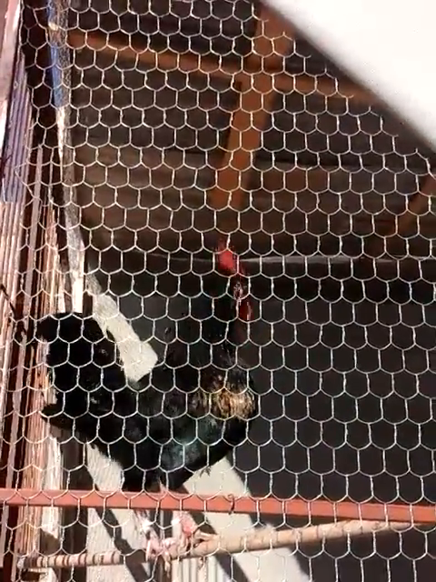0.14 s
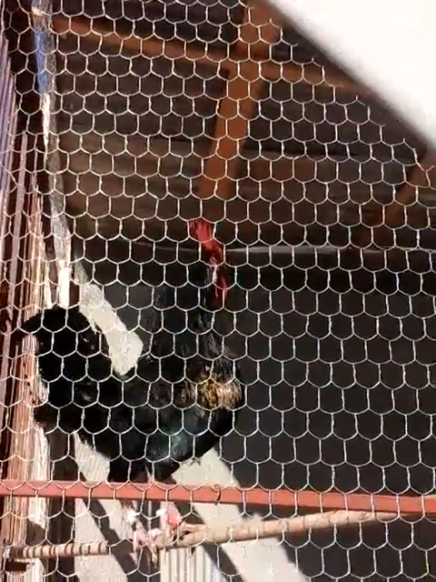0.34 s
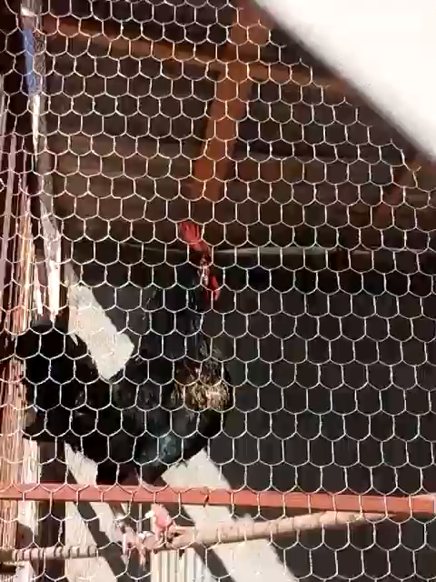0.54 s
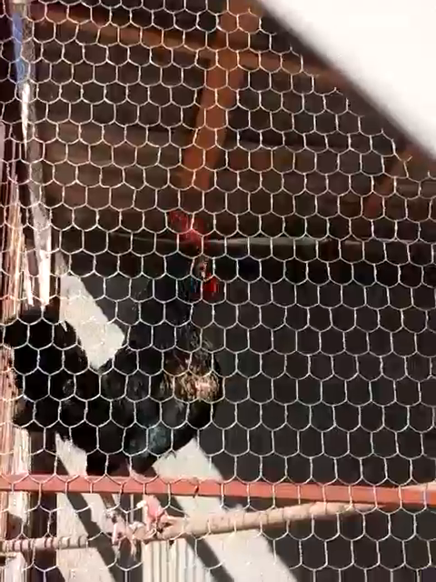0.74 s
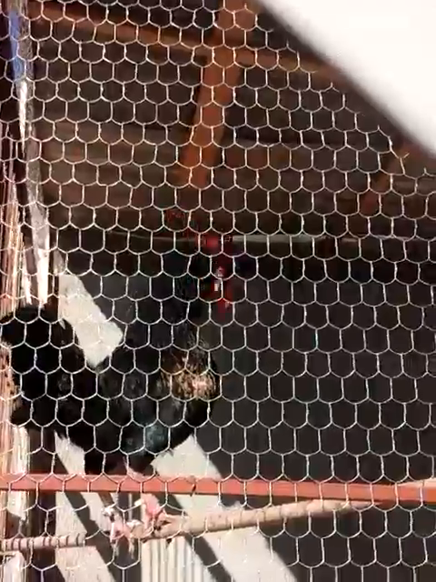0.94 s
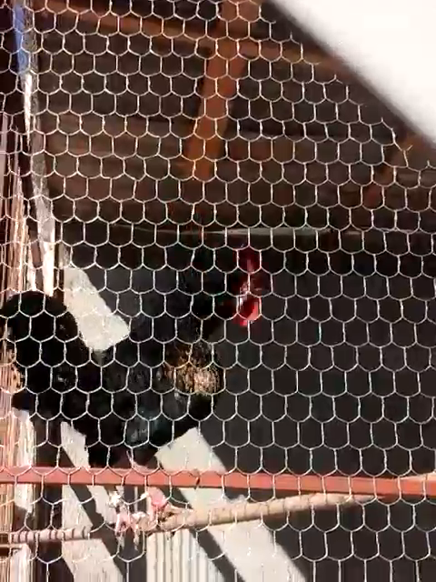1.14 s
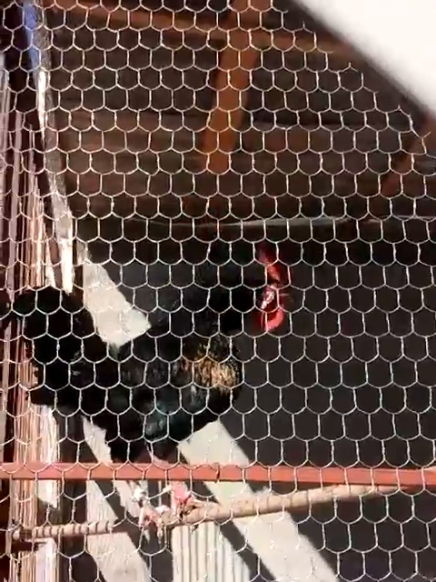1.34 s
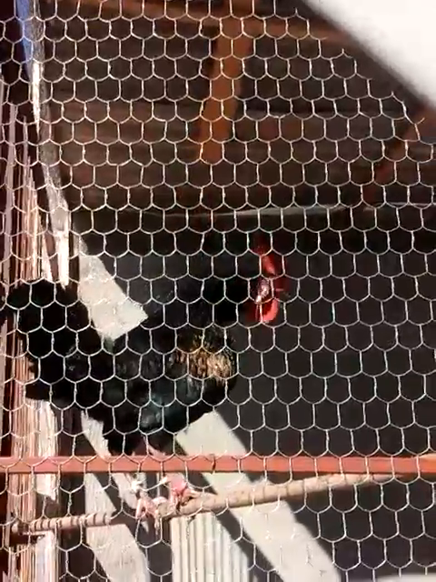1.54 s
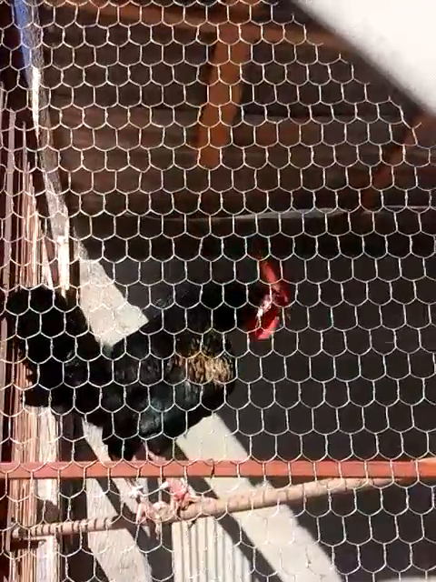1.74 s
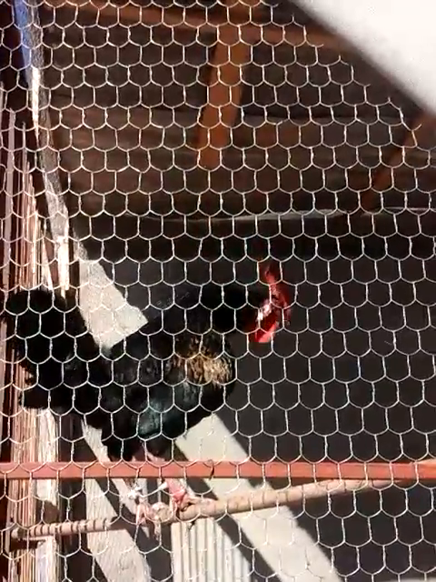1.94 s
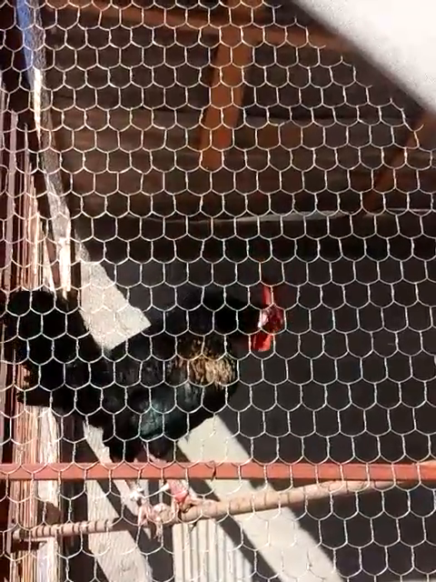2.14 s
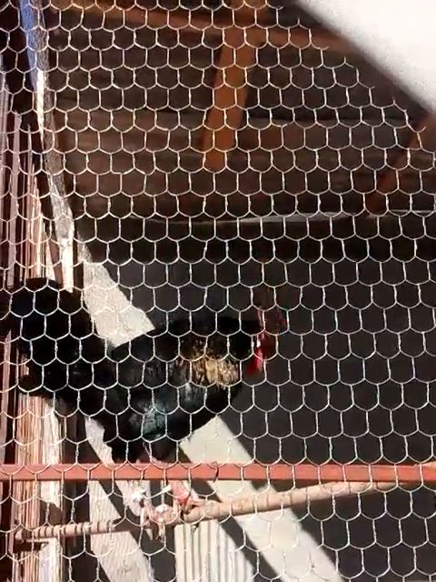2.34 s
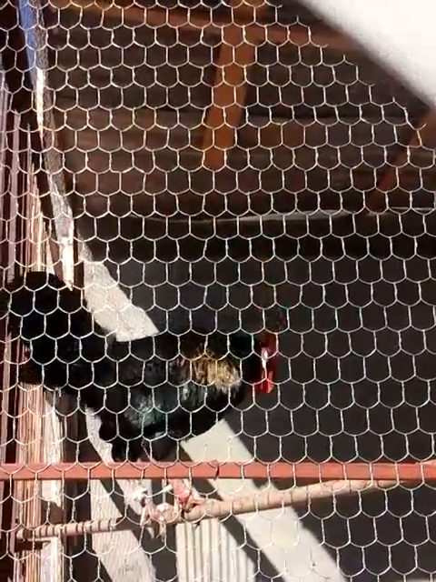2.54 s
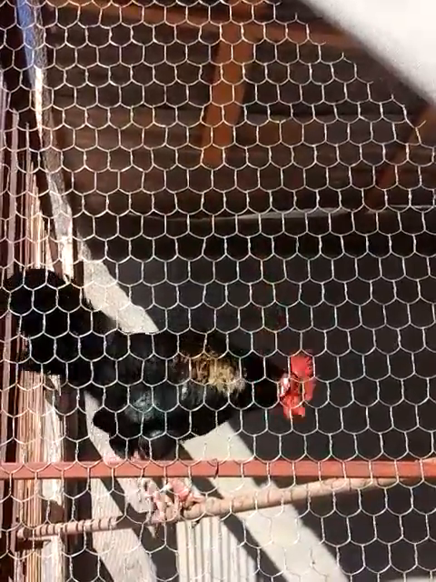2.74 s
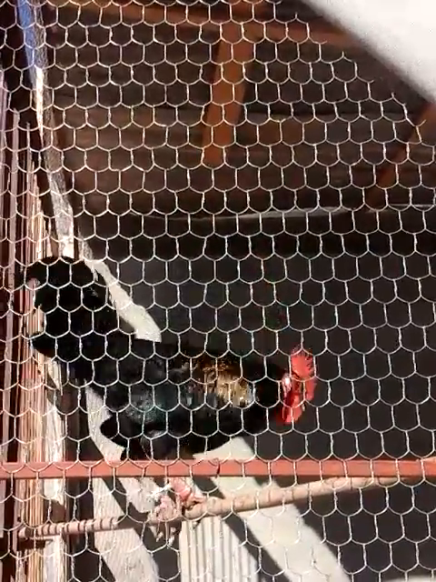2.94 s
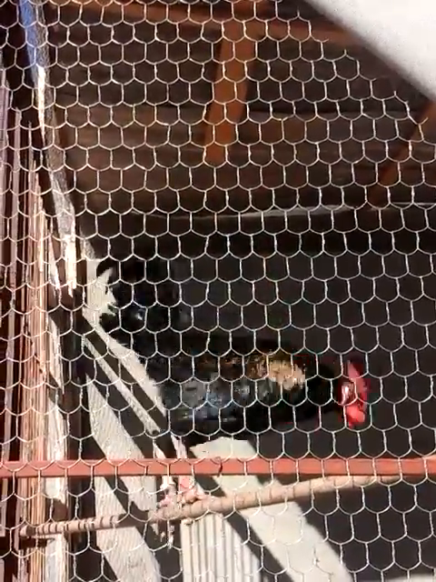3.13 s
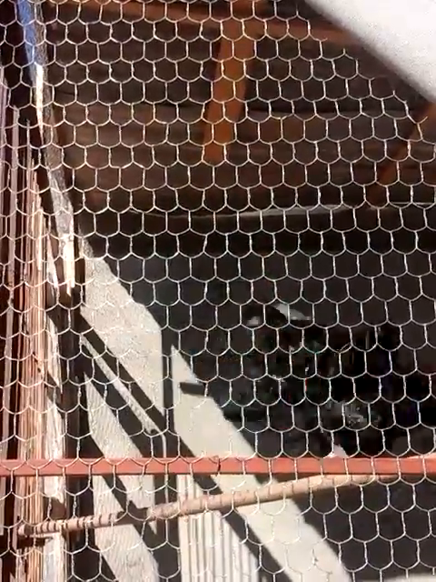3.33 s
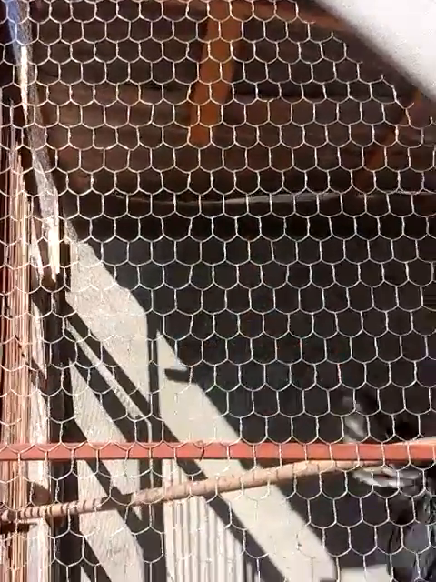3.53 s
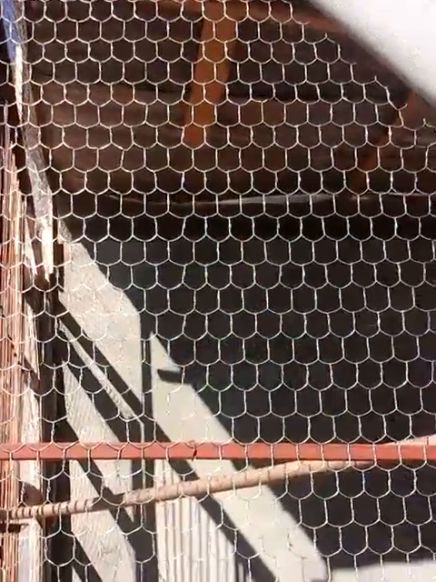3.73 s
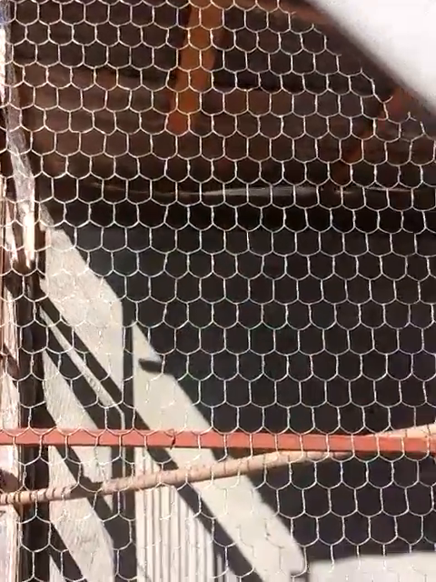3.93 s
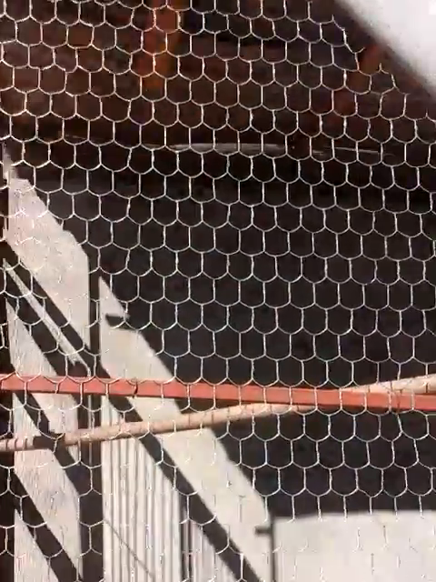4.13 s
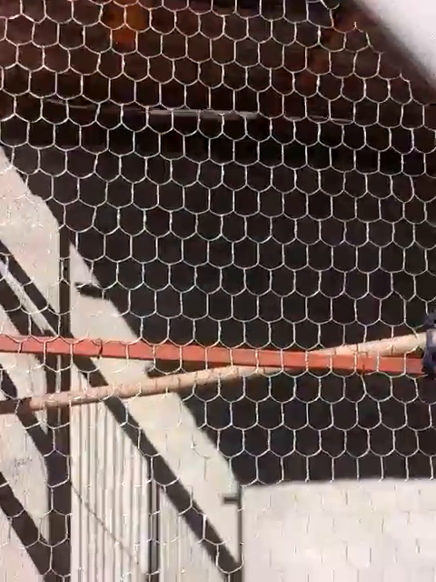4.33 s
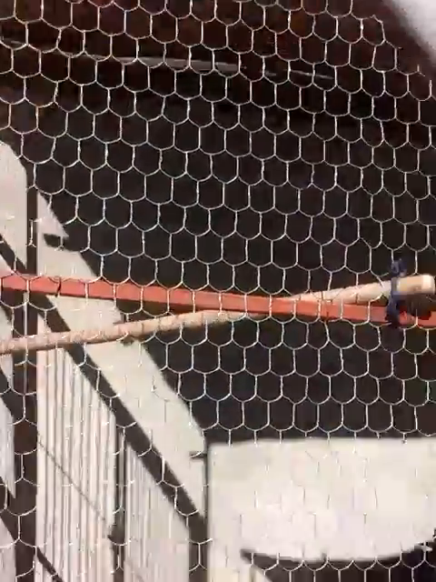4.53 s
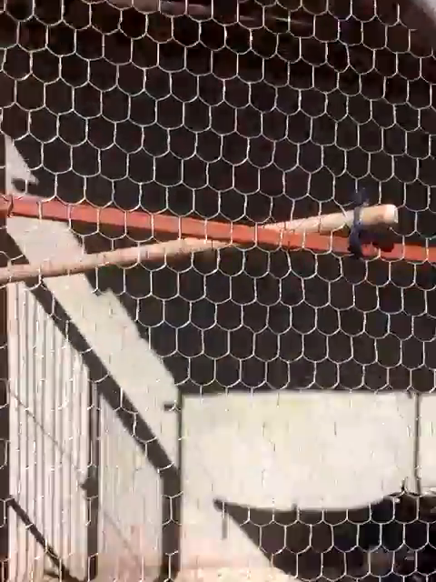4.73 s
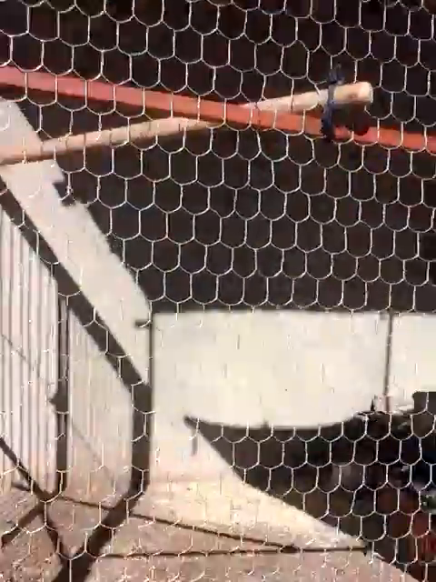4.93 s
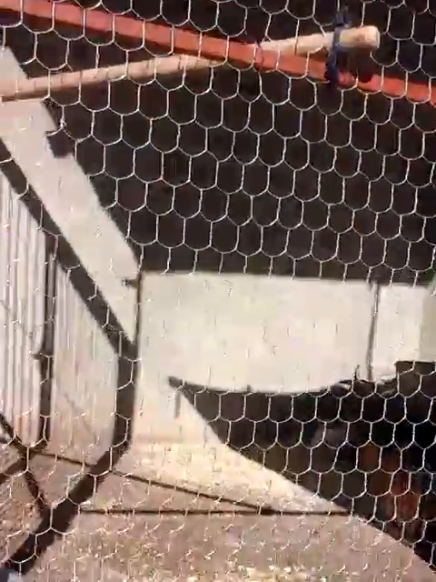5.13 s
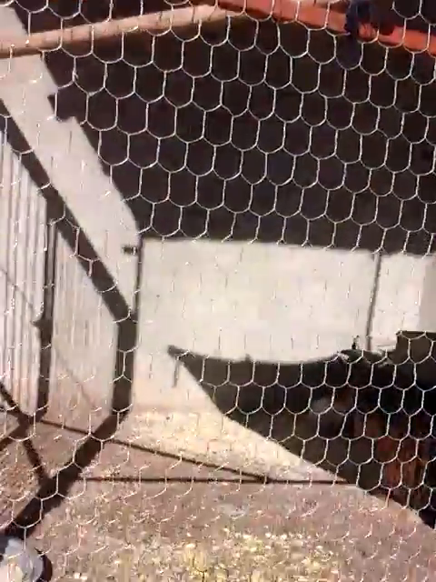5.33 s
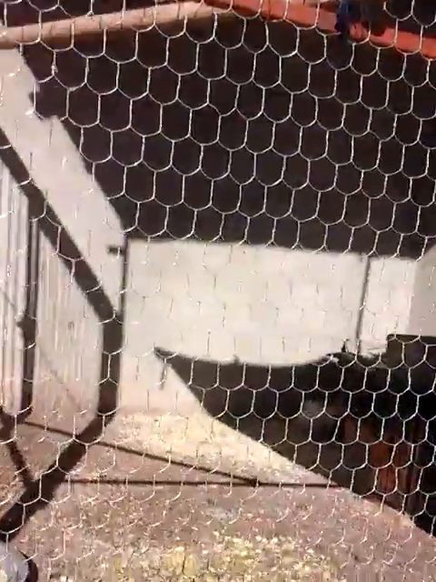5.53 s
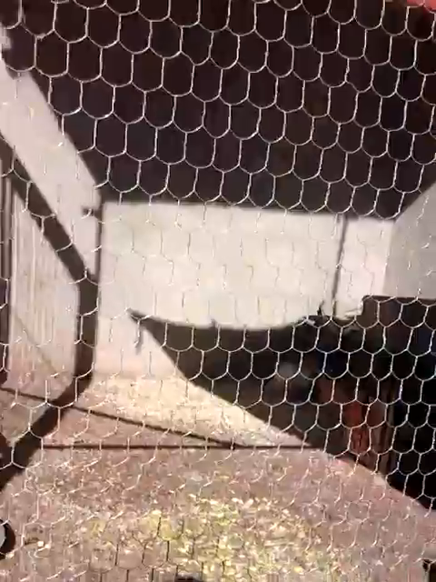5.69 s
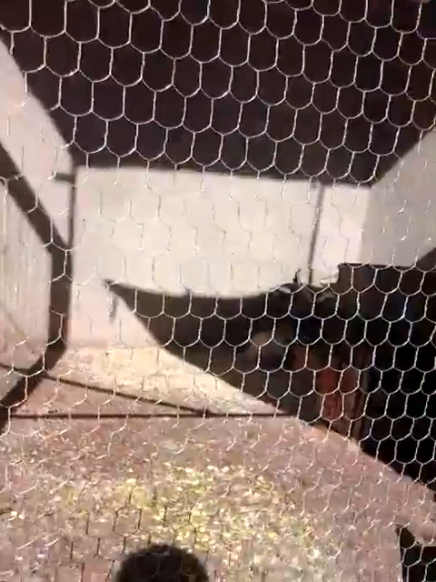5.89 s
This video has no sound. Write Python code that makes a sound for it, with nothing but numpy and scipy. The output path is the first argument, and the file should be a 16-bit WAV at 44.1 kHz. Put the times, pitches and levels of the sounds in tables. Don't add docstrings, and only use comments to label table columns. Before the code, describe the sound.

A rooster close by crows once, two rough notes into a long hoarse cry that falls away, then wheezes in, clinks its perch and flaps down.

```python
import sys
import numpy as np
from scipy import signal
from scipy.fft import rfft, irfft, next_fast_len
from scipy.io import wavfile
from scipy.ndimage import uniform_filter1d, minimum_filter1d, map_coordinates

SR = 44100
rng = np.random.default_rng(int(sys.argv[2]) if len(sys.argv) > 2 else 0)


def how_loud(loudness_db):
    steps = np.asarray(loudness_db, float) / 20
    return 10 ** steps


def wav_record(signal):
    frames = np.transpose(np.atleast_2d(signal))
    bounded = np.clip(frames, -1, 1)
    quanta = np.round(bounded * 32767).astype(np.int16)
    wavfile.write(sys.argv[1], SR, quanta)


N = 262836
CROW_N = int(2.5 * SR)
SOIL_FROM_S = 3.5


def unit(x):
    return x / np.sqrt(np.mean(x ** 2) + 1e-20)


def along(points, hz):
    f, v = np.transpose(points)
    return np.interp(np.log(hz + 1), np.log(f + 1), v)


def curves(rows, n=N):
    s, *cols = np.transpose(rows)
    return [np.interp(np.arange(n) / SR, s, c) for c in cols]


def gate(rows, fade, n=N):
    t = np.arange(n) / SR
    rise = np.clip((t - rows[0][0]) / fade, 0, 1)
    return rise * np.clip((rows[-1][0] - t) / fade + 1, 0, 1)


def wobble(rate, n=N):
    return map_coordinates(rng.standard_normal(6000), [np.arange(n) * min(rate, 900) / SR])


def peaks(hz, modes, order=2):
    gain = 0
    for c, w, db in modes:
        damping = (hz * w) ** 2
        gain = gain + how_loud(db) * (damping / ((c * c - hz * hz) ** 2 + damping + 1)) ** (order / 2)
    return gain


def noise(gain, n=N):
    m = next_fast_len(n)
    return unit(irfft(rfft(rng.standard_normal(m)) * gain(np.fft.rfftfreq(m, 1 / SR)), m)[:n])


def even(x, span):
    return x / np.sqrt(np.abs(uniform_filter1d(x * x, int(span * SR))) + 1e-12)


def tone(hz, jitter_hz, shimmer_db, rate):
    phase = 2 * np.pi * np.cumsum(hz + jitter_hz * wobble(rate)) / SR
    return unit(how_loud(shimmer_db * wobble(rate / 2)) * np.sin(phase))


def swells(rows):
    t = np.arange(N) / SR
    return sum(db * np.exp(-((t - s) / wide) ** 2) for s, db, wide in rows)


def sing(rows, fade, jitter_hz, shimmer_db, rate):
    hz, db = curves(rows)
    return gate(rows, fade) * how_loud(db) * tone(hz, jitter_hz, shimmer_db, rate)


# t/s, length/s, f/Hz, level/dB
MACHINE_RUNS = [(0, 0.33, 209, -58), (1.723, .4, 200.5, -58.5), (2.302, .45, 202.5, -55),
                (3.503, 0.22, 230.6, -60), (4.046, 0.27, 222.1, -60), (4.471, 0.18, 186, -64.5),
                (4.794, 0.58, 225.4, -60.5)]
# f/Hz, density level/dB per Hz
WIND_SPECTRUM = [(21, -47), (35, -10.5), (80, -3), (129, 1), (162, -7), (200, -5), (260, -33), (440, -120)]
MURMUR_SPECTRUM = [(150, -30.5), (250, -4), (342, -11.5), (816, -12), (1200, -15), (1610, -15),
                   (2800, -20.5), (3640, -48), (6160, -120)]
HISS_SPECTRUM = [(1350, -36.5), (2300, -16.5), (3050, -1), (3940, 1.5), (4450, -4), (6650, -10.5),
                 (8680, -11.5), (13400, -12), (14100, -13)]
# t/s, swell level/dB, width/s
GUSTS = [(.31, 4.7, 0.14), (1.458, 1.6, 0.091), (2.548, 7.8, 0.45), (3.821, 10, 0.182), (5.581, 5.65, 0.14)]
# t/s, level change/dB, width/s
BACKGROUND_SWELLS = [(2.6, 4, 0.26), (3.3, -3.5, 0.19), (3.75, 8.5, 0.22), (4.15, 6, 0.18), (4.85, 4, 0.29),
                     (5.45, 5, 0.21)]


def yard():
    idle_hz, idle_db = 229, -68
    runs = np.array([gate([(s,), (s + length,)], 0.2) for s, length, _, _ in MACHINE_RUNS])
    _, _, run_hz, run_db = np.transpose(MACHINE_RUNS)
    hz = idle_hz + (run_hz - idle_hz) @ (runs > 0)
    hum_db = idle_db + (run_db - idle_db) @ runs
    fuzz = noise(lambda f: peaks(f, [(196, 280, 0)]))
    hum = how_loud(hum_db) * (0.88 * tone(hz, 12, 3.1, 30) + 0.75 * fuzz)

    wind_db = -67.5 + swells(GUSTS) + 3.4 * wobble(3.4)
    wind = how_loud(wind_db) * noise(lambda f: how_loud(along(WIND_SPECTRUM, f)))

    background_db = swells(BACKGROUND_SWELLS) - 2.5 * np.clip(np.arange(N) / SR - SOIL_FROM_S, 0, None)
    murmur_db = -63 + 0.42 * background_db + 1.5 * wobble(3.4)
    murmur = how_loud(murmur_db) * noise(lambda f: how_loud(along(MURMUR_SPECTRUM, f)))
    hiss_db = -66.5 + background_db + .8 * wobble(12)
    hiss = how_loud(hiss_db) * noise(lambda f: how_loud(along(HISS_SPECTRUM, f)))
    return wind + hum + murmur + hiss


# t/s, f/Hz, level/dB
FAR_HEN = [(0.0, 816, -68), (0.02, 773, -55), (0.059, 800, -59), (0.075, 825, -92)]
# t/s, f/Hz, level/dB
CHIRPS = [
    [(4.85, 4100, -73), (4.9, 3800, -69), (4.96, 3914, -69)],
    [(5.415, 4950, -61), (5.435, 3970, -63), (5.46, 4200, -68), (5.52, 3836, -69), (5.56, 3690, -74)],
]


def far_birds():
    hen = sing(FAR_HEN, 0.0058, 11, 3.0, 60)
    return hen + sum(sing(rows, .01, 300, 5, 500) for rows in CHIRPS)


# f/Hz, t60/s
SHED_DECAY = [(300, 0.17), (1600, 0.55), (5000, 0.08), (12000, 0.035)]


def shed(x):
    hz, t, z = signal.stft(rng.standard_normal(SR // 2), SR, nperseg=256)
    decay = how_loud(-60 * t / along(SHED_DECAY, hz)[:, None])
    tail = signal.istft(z * decay, SR, nperseg=256)[1]
    return signal.fftconvolve(np.pad(x, (350, 0)), tail / np.linalg.norm(tail))[:N]


# delay t/s, level/dB
BOARDS = [(.0047, -16.5), (.011, -13.5), (.019, -12), (.028, -13)]


def boards(x):
    return sum(how_loud(db) * np.pad(x, (round(s * SR), 0))[:N] for s, db in BOARDS)


# t/s, feather level/dB, thud level/dB, hold/s
BLOWS = [
    (3.642, -44, -44.5, 0.018),
    (3.824, -34.5, -33.5, 0.0071),
]
# f/Hz, density level/dB per Hz
FEATHERS = [(410, -38), (700, 0), (1020, -8), (1330, -5.5), (1450, -7.5), (2510, -7), (3440, -6.5),
            (4000, -2), (6200, -17), (9500, -27), (14000, -23)]
GROUND = [(29, -49.5), (50, -17), (184, -0.5), (317, -3.5), (388, -2), (724, -22), (1010, -29),
          (1200, -15.5), (1560, -58), (2640, -120)]


def flap():
    t = np.arange(N) / SR

    def blow(s, hold, fall_db_per_s):
        before = np.clip(s - hold / 2 - t, 0, 1)
        after = np.clip(t - s - hold / 2, 0, 1)
        return -457 * before - fall_db_per_s * after

    shuffle = gate([(3.5,), (4.02,)], 0.11)
    feather = how_loud(-58) * shuffle + sum(how_loud(db + blow(s, hold, 410)) for s, db, _, hold in BLOWS)
    body = how_loud(-59) * shuffle + sum(how_loud(db + blow(s, hold, 220)) for s, _, db, hold in BLOWS)
    grains = how_loud(2.2 * wobble(300) + 1.5 * wobble(60))
    rustle = unit(noise(lambda f: how_loud(along(FEATHERS, f))) * grains)
    thud = unit(noise(lambda f: how_loud(along(GROUND, f))) * how_loud(3.3 * wobble(48.5)))
    return feather * rustle + body * thud


# t/s, peak level/dB, ring f/Hz, low ring level/dB
CLAW_TOUCHES = [(2.8145, -43, 4080, -16), (2.8594, -35.5, 3840, -15), (2.8714, -40, 3487, -16),
                (2.9647, -46, 3110, -16), (3.0574, -34.5, 4180, -4), (3.1961, -50.5, 4060, -17),
                (3.246, -49, 3570, -13), (3.2695, -42, 3550, -16), (3.6, -34, 3900, -17),
                (3.785, -47, 4000, -13), (4.0198, -42, 4630, -16), (4.0774, -43, 4020, -16),
                (4.1315, -40, 3955, -16), (4.1969, -37.5, 3500, -12), (4.2946, -40.5, 3610, -17),
                (5.253, -50, 3400, -15.5), (5.4256, -55, 3960, -16.5), (5.4595, -54, 4080, -16),
                (5.5204, -58, 3850, -16), (2.9297, -35, 3920, 7), (3.3443, -40.5, 4050, 2)]
# f/Hz, t60/s
PERCH_MODES = [(2250, 0.049), (3080, 0.027), (3530, 0.021), (4060, 0.045), (4600, 0.011), (5100, 0.0082)]


def claws():
    out, t = np.zeros(N + SR), np.arange(SR // 4) / SR
    for s, db, hz, low_db in CLAW_TOUCHES:
        on_soil = s > SOIL_FROM_S
        bar = 0
        for mode, t60 in PERCH_MODES:
            mode_db = -5 - 14 * abs(np.log2(mode / hz)) + (low_db + 6) * (mode < 2600) - 14 * on_soil
            mode_db += 2.5 * rng.standard_normal()
            bar = bar + how_loud(mode_db - 60 * t / t60) * np.sin(2 * np.pi * mode * t)
        scratch = noise(lambda f: peaks(f, [(hz * 0.99, 1400, 0)]), len(t))
        scratch *= (.45 if on_soil else .3) * how_loud(-60 * t / 0.17)
        crack = noise(lambda f: peaks(f, [(4200, 2930, 0), (9010, 8200, -25)]), len(t))
        crack *= (.8 if db > -40 else .4) * how_loud(-60 * t / 0.0084)
        onset = 1 - np.exp(-t / 0.00023)
        out[round(s * SR):][:len(t)] += how_loud(db - 7.5) * (bar + scratch + crack) * onset
    return out[:N]


# t/s, peak level/dB, f/Hz, t60/s
GULPS = [
    (2.534, -23.5, 671, 0.13),
    (2.554, -44, 660, 0.087),
    (2.603, -38, 697, 0.097),
    (2.665, -27.5, 678, 0.07),
    (2.697, -40, 650, 0.085),
    (2.723, -31.5, 700, 0.06),
    (2.79, -42, 695, 0.054),
    (2.813, -47, 651, 0.09),
]


def gulps():
    out, t = np.zeros(N), np.arange(SR // 8) / SR
    for s, db, hz, t60 in GULPS:
        ring = how_loud(-60 * t / t60) * np.sin(2 * np.pi * hz * t)
        puff = noise(lambda f: peaks(f, [(700, 580, 0)]), len(t)) * 0.49 * how_loud(-60 * t / 0.047)
        onset = 1 - np.exp(-t / (.01 if s < 2.65 else .0045))
        out[round(s * SR):][:len(t)] += how_loud(db) * (ring + puff) * onset
    return out


# t/s, f/Hz, level/dB
WHEEZE = [(2.33, 700, -34), (2.382, 711, -43), (2.44, 668.4, -47), (2.5, 628.3, -46.5), (2.56, 655, -47),
          (2.6, 660, -50.5), (2.73, 656.4, -46), (2.76, 631.5, -74), (2.88, 654, -76)]
# f/Hz, width/Hz, level/dB
GULLET = [(325, 57, 5), (945, 48, 15), (1190, 210, 2.5), (1532, 55, -5), (1914, 37, -1), (2300, 90, -2),
          (2640, 300, -5), (3650, 530, -1), (5610, 440, -15)]
# t/s, f/Hz, level/dB
CROAK = [[(2.47, 318 * k, db - 12), (2.56, 334 * k, db),
         (2.61, 330 * k, db - 12)] for k, db in enumerate([-43.5, -71, -58, -56.0], 1)]


def wheeze():
    hz, tone_db = curves(WHEEZE)
    t = np.clip(np.arange(N) / SR - WHEEZE[0][0], 0, None)
    thinning = how_loud(-45.5 - 52 * t)
    gasp = how_loud(-24.5 - 60 * t / 0.037)
    flow = thinning + gasp + how_loud(tone_db - 19.5) * np.clip(t / 0.052, 0, 1) ** 2
    air = noise(lambda f: peaks(f, GULLET)) * how_loud(1.6 * wobble(29.6))
    note = how_loud(tone_db) * tone(hz, 18, 4, 120)
    croak = sum(sing(rows, 0.0058, 11, 3.0, 60) for rows in CROAK)
    return gate(WHEEZE, 0.0026) * (note + flow * air) + croak


# t/s, f/Hz, level/dB
LEAD_IN = [(.13, 687, -40.5), (.165, 732.5, -28), (.2, 695, -40), (.235, 700, -35), (.265, 742, -26.5),
           (.3, 723, -47.5)]
WHISTLE = [(.33, 766, -28.5), (.37, 769.5, -17.5), (.47, 769, -39.5), (.495, 740.4, -17), (.55, 742, -18),
           (.62, 746, -24.5), (.68, 745.7, -16), (.75, 738.7, -22), (.77, 738.5, -25), (.95, 757, -38),
           (1.1, 755.6, -35.5), (1.25, 730.5, -38.5)]
# t/s, f/Hz, level/dB
PARTNERS = [
    [(.8, 1235, -36), (.93, 1233, -24.5), (1.1, 1217, -27.5), (1.28, 1230, -26.5), (1.45, 1216, -30),
     (1.58, 1200, -35)],
    [(.8, 2102, -33.5), (.92, 2085, -26.5), (1.1, 2085, -32), (1.25, 2055, -29), (1.4, 2024, -27.5),
     (1.5, 2124, -29.5), (1.59, 2094, -36.5)],
    [(1.93, 724, -37), (1.985, 710, -26), (2.02, 748, -35.5), (2.09, 750, -48)],
]


def second_membrane():
    return sum(sing(rows, 0.0058, 11, 3.0, 60) for rows in (WHISTLE, LEAD_IN, *PARTNERS))


# t/s, f/Hz, hoarseness 0-1, half-pitch level/dB
VOICE = [
    [(.07, 543, 0.95, -36), (.12, 613, 0.77, -44), (.2, 647, 0.48, -50.5), (.24, 598.3, 0.76, -35),
     (.31, 588, 0.8, -24)],
    [(.325, 613.5, 1, -26.5), (.347, 685.5, 0.9, -19), (.35, 545.5, 0.8, -24), (.41, 546.9, 1, -4),
     (.468, 597, 0.86, -26), (.476, 655, 0.7, -25.5), (.494, 672, .7, -25), (.503, 730, 0.5, -30),
     (.536, 738, 0.45, -25)],
    [(.54, 861.6, 0.84, -12), (.7, 846.7, 1.13, -3.5), (.86, 846, 0.91, -8), (1.1, 846.3, 0.91, -7.5),
     (1.22, 819.6, 1, 1), (1.45, 805, 1.04, -3.5), (1.6, 791.7, 0.88, -12.5), (1.69, 788, .86, -12),
     (1.73, 784, .66, -18), (1.95, 770, .66, -22), (1.986, 762, .95, -22)],
    [(1.988, 626, .85, -35), (2.02, 616, .2, -48), (2.15, 574, .1, -55), (2.23, 543, .05, -58),
     (2.272, 534, .05, -58), (2.29, 504.6, 0.94, -10.5), (2.36, 525, 0.75, -41)],
]


def syrinx(squeeze, clearing):
    n = CROW_N
    hz, hoarse, half_db = curves(sum(VOICE, []), n)
    hoarse = hoarse * (1 - .62 * clearing)
    half_db = half_db - 28 * clearing
    breath_db = -30 + 41 * hoarse
    jitter_hz = 1.5 + 11.5 * hoarse * (1 - .6 * np.clip(squeeze, 0, 1))
    cycle = 2 * np.pi * np.cumsum(hz + jitter_hz * wobble(380, n)) / SR
    pulses = sum(np.cos(k * cycle + .4 * k * k) * (k * hz < 15000) for k in range(1, 29))
    pulses *= 1 + how_loud(half_db + 2.5 * wobble(35, n)) * np.cos(cycle / 2 + 1.8)
    beat = 2 * np.pi * np.cumsum(92 + 30 * wobble(40, n)) / SR
    pulses *= 1 + np.clip(jitter_hz / 15 - .1 - .2 * squeeze, 0, .75) * np.cos(beat)
    breath = rng.standard_normal(n) * (1 + 0.89 * np.cos(cycle)) * how_loud(wobble(90, n))
    return pulses, breath, breath_db, jitter_hz


# f/Hz, width/Hz, level/dB
WINDPIPE = [(367, 100, -11.5), (556, 650, -16.5), (770, 210, 11.5)]


def windpipe_gain(f, opening):
    cut_hz = 580 - 260 * opening
    return peaks(f, WINDPIPE, order=3) * f ** 6 / (f ** 6 + cut_hz ** 6)


# low and main (f/Hz, width/Hz), then upper (width/Hz)
THROAT = [(1275, 270), (1620, 300), (330,)]
# t/s, main level/dB, low level/dB, upper level/dB
THROAT_LEAN = [(.08, 5, -8.5, 2), (.14, -4, -2, 7), (.22, -5, 1.5, 6), (.25, 0.5, 0.5, -1),
               (.33, 3.5, -4.5, -1), (.36, 4.5, -5, -5.5), (.42, 5, -0.5, -0.5), (.46, -7.5, -9, -1.5),
               (.5, 4.5, -7.5, -4), (.55, -4, 2.5, 1.5), (.69, 6, -1.5, -2.5), (.74, -4, 0, -11),
               (.78, 7.5, 2.5, -0.5), (.88, 0.5, 0.5, -7), (1.02, -5.5, -0.5, -4), (1.3, -7.5, 1, -2),
               (1.5, 5.5, 0, -3), (1.65, 4, -1, 2), (1.71, -3, 3.5, 9), (1.8, 0.5, 1, 5.5),
               (1.88, 0.5, 4.5, 0), (1.95, -0.5, 7.5, -7), (2.0, -7.5, -2, 6), (2.09, -5.5, 1.5, 0),
               (2.16, 0, 8.5, -5), (2.22, -13, -14, -10), (2.27, 5, -9, -1), (2.29, 11, 11, 2.5)]


def throat_gain(f, at, opening, squeeze, jitter_hz):
    main_db, low_db, upper_db = [c[at] for c in curves(THROAT_LEAN)]
    low_db = low_db - 2.5 - 1.5 * squeeze
    upper_hz = 2250 - 130 * opening - 76 * squeeze
    upper_db = upper_db - 17.5 + 1.55 * jitter_hz - 3 * squeeze
    modes = [(*THROAT[0], low_db), (*THROAT[1], main_db), (upper_hz, *THROAT[2], upper_db)]
    pouch_hz = upper_hz + 300 - 130 * np.clip(opening, 0, 1) - 110 * squeeze
    return peaks(f, modes, order=3) / (1 + (f / pouch_hz) ** 20)


def mouth_gain(f, mouth_hz, squeeze):
    modes = [(mouth_hz, 440, 0), (2800, 450, 32 * squeeze - 34), (3350, 2000, 30 * squeeze - 39)]
    return peaks(f, modes, order=3)


# f/Hz, width/Hz, level/dB
TONGUE = (4670, 540, -3.5)
# f/Hz, width/Hz, level/dB
BEHIND_BEAK = [(6590, 580, -6.5), (7310, 280, -11)]
# t/s, swell level/dB, width/s
BEHIND_SWELLS = [(.22, 10, 0.11), (.36, 5.5, 0.059), (2.15, -1.5, 0.13)]


def beak_gain(f, at, mouth_hz, wide, squeeze):
    shut = peaks(f, [(mouth_hz + 1310, 328, 6)], order=3)
    hz, width, db = TONGUE
    tongue = (hz - 450 * squeeze, width, db + 15 * squeeze - 12)
    gaping = peaks(f, [(5504 - 350 * squeeze, 710 + 420 * squeeze, 0), tongue], order=3)
    behind_db = -12.5 + 7 * wide - 9.5 * squeeze + swells(BEHIND_SWELLS)[at]
    behind = how_loud(behind_db) * peaks(f, BEHIND_BEAK, order=3)
    return (1 - wide) * shut + wide * gaping + behind


def nostril_notch(f, opening, squeeze):
    depth = .9 * np.clip(1 - 3 * squeeze, 0, 1)
    return 1 - depth * peaks(f, [(4200 + 250 * opening, 170, 0)])


# f/Hz, width/Hz, level/dB
HIGHEST_BAND = [(8100, 630, -2), (9110, 1600, -2), (10540, 1300, -6), (11520, 1400, -12), (12500, 2000, -9)]


def highest_gain(f, wide):
    return peaks(f, HIGHEST_BAND, order=3) * (8500 / (f + 500)) ** (1.8 - 4.4 * wide)


# t/s, level/dB
EFFORT = [
    [(.079, -30.5), (.086, -21), (.11, -15.5), (.17, -19), (.205, -19.5), (.222, -15.5), (.238, -24),
     (.26, -19.5), (.31, -39.5), (.32, -27)],
    [(0.322, -21), (0.332, -13.5), (.36, -15), (.375, -19.5), (0.388, -14), (0.398, -23), (0.45, -19),
     (0.486, -18), (0.516, -17.5), (0.55, -17)],
    [(0.555, -18.5), (0.589, -17), (1.325, -17.5), (1.637, -14), (1.661, -11.5), (1.692, -10.5),
     (1.715, -13.5), (1.745, -13), (1.76, -11.5), (1.88, -7), (1.895, -14), (1.95, -16), (1.97, -16.5)],
    [(1.995, -23), (2.025, -21.5), (2.23, -21), (2.27, -22), (2.285, -17), (2.31, -25), (2.349, -54.5),
     (2.37, -31)],
]
# t/s, level change/dB, width/s
WINDPIPE_SWELLS = [(.5, 3, 0.0047), (.6, 5.5, 0.058), (1.05, 1.5, 0.14), (1.75, -0.5, .04),
                   (1.99, 7, 0.038), (2.1, 4, 0.047), (2.31, -5, 0.023), (2.37, 4.5, 0.06)]
# t/s, swell level/dB, width/s
MOUTH_SWELLS = [(.2, 1.5, 0.013), (.47, 4, 0.036), (.6, 1.5, 0.051), (.75, -3.5, 0.03), (1.66, 3, 0.03),
                (1.94, 3.5, 0.066), (2.16, 3.5, 0.046), (2.24, -8.5, 0.016), (2.32, 7, 0.013)]
BEAK_SWELLS = [(.155, 7.5, 0.01), (.66, 5, 0.099), (.82, 12.5, 0.041), (1.66, -1.5, 0.014),
               (1.72, 1, 0.025), (1.8, -2.5, 0.075), (1.93, -2, 0.044), (2.03, 2.5, 0.02), (2.2, 7, 0.051)]
HIGHEST_SWELLS = [(.2, 2, 0.16), (.7, -0.5, 0.11), (1.3, 1, 0.22), (1.8, -2, 0.14), (2.15, -2.5, 0.1)]


def tract_levels(opening, squeeze, clearing):
    n = CROW_N
    throat_db, = curves(sum(EFFORT, []), n)

    def flutter():
        return 1.5 * wobble(18, n)

    windpipe_db = 0.7 * throat_db - 16.5 - 3.5 * squeeze - 7 * clearing + swells(WINDPIPE_SWELLS)[:n] + flutter()
    mouth_db = throat_db - 5 - 28.5 * squeeze - 5 * clearing + swells(MOUTH_SWELLS)[:n] + flutter()
    beak_db = throat_db - 20.5 + 13.5 * opening ** 2 - 7 * squeeze - 6 * clearing
    beak_db += swells(BEAK_SWELLS)[:n] + flutter()
    highest_db = 0.68 * throat_db + 0.26 * beak_db - 4 * squeeze + swells(HIGHEST_SWELLS)[:n]
    highest_db = uniform_filter1d(highest_db, size=5000) - 31
    return [windpipe_db, throat_db, mouth_db, beak_db, highest_db]


# t/s, mouth f/Hz, beak opening 0-1, neck squeeze 0-1
POSTURE = [
    [(.085, 3650, 0.16, 0.26), (.125, 3160, 0.49, 0.22), (.29, 3260, 0.42, 0)],
    [(.34, 3290, 0, 0.2), (.52, 3444, 0, 0.08)],
    [(.58, 3372, 0.1, 0.09), (.81, 3250, 0.05, 0.05), (1.03, 3140, 0.6, 0.18), (1.2, 3107, 1, 0.44),
     (1.5, 3044, 0.98, 0.6), (1.66, 3040, 0.95, 0.7), (1.88, 3480, 0.65, 1)],
    [(2.02, 3904, 1.01, 0), (2.27, 3490, 0.84, 0.15), (2.35, 3500, 0.66, 0.37)],
]


def crow():
    n = CROW_N
    mouth_hz, opening, squeeze = curves(sum(POSTURE, []), n)
    clear_from, clear_to = 1.605, 1.67
    clear_points = [(clear_from, 0), (clear_from + .05, 1), (clear_to, 1), (clear_to + .028, 0)]
    clearing = np.clip(curves(clear_points, n)[0], 0, 1) ** .5
    pulses, breath, breath_db, jitter_hz = syrinx(squeeze, clearing)

    f, t, z = signal.stft([pulses, breath], SR, nperseg=1024, noverlap=832)
    f, at = f[:, None], np.minimum((t * SR).astype(int), n - 1)
    mouth_at, open_at, squeeze_at, jitter_at = [c[at] for c in (mouth_hz, opening, squeeze, jitter_hz)]
    patches = uniform_filter1d(rng.standard_normal(z.shape[1:]), size=9, axis=0)
    patches = uniform_filter1d(patches, size=3, axis=1)
    z[0] *= how_loud((np.clip(f / 1000, 1, 4.5) + .12 * jitter_at) * unit(patches))

    wide = np.clip(2 * open_at - .2, 0, 1)
    notch = nostril_notch(f, open_at, squeeze_at)
    gains = [windpipe_gain(f, open_at),
             throat_gain(f, at, open_at, squeeze_at, jitter_at),
             notch * mouth_gain(f, mouth_at, squeeze_at),
             notch * beak_gain(f, at, mouth_at, wide, squeeze_at),
             highest_gain(f, wide)]
    extra_breath_db = [-8 + 4 * squeeze ** 3 - 6 * clearing,
                       -12 - 2 * squeeze ** 2,
                       10 * squeeze - 4 - 11 * clearing,
                       2 + 9 * squeeze - 15 * clearing,
                       16]
    out = np.zeros(n)
    for gain, level_db, extra_db in zip(gains, tract_levels(opening, squeeze, clearing), extra_breath_db):
        voiced, air = signal.istft(z * gain, SR, nperseg=1024, noverlap=832)[1][:, :n]
        share = 1 / (1 + how_loud(-2 * (breath_db + extra_db)))
        out += how_loud(level_db) * (np.sqrt(1 - share) * even(voiced, 0.039) + np.sqrt(share) * even(air, 0.042))
    return np.pad(out * gate(sum(EFFORT, []), .004, n), (0, N - n))


def scene():
    bird = crow() + second_membrane() + far_birds() + wheeze() + gulps()
    feet = claws() + flap()
    walls = how_loud(-17) * shed(bird) + boards(bird)
    return (bird + walls + feet + how_loud(-23.5) * shed(feet) + yard())[None]


def drop_masked(x, under_db, wide):
    hz, t, z = signal.stft(x, SR, nperseg=1024, noverlap=512)
    power = uniform_filter1d(np.abs(z) ** 2, size=3, axis=1)
    band = np.arange(len(hz)) // wide
    mean = np.array([power[band == b].mean(0) for b in range(band[-1] + 1)])
    luck = uniform_filter1d(rng.standard_normal(mean.shape), size=9, axis=1)
    audible = mean * how_loud(24 * luck) > power.sum(0) * how_loud(2 * under_db)
    kept = audible[band] | (hz[:, None] < 1900)
    return signal.istft(z * kept * (hz[:, None] < 14000), SR, nperseg=1024, noverlap=512)[1][:N]


def top_cut(x):
    return signal.sosfilt(signal.butter(12, 14250, fs=SR, output="sos"), x)


def record(dry):
    need = minimum_filter1d(np.minimum(1, .66 / (np.abs(dry) + 1e-9)), size=220, axis=1)
    held = dry * uniform_filter1d(need, size=200, axis=1)
    mix = drop_masked(held[0], under_db=-59, wide=5)[None]
    return top_cut(mix)


dry = scene()
out = record(dry)
wav_record(out)
```